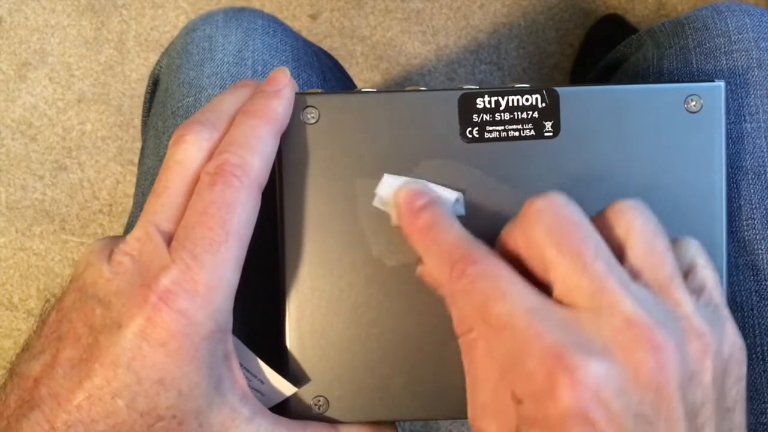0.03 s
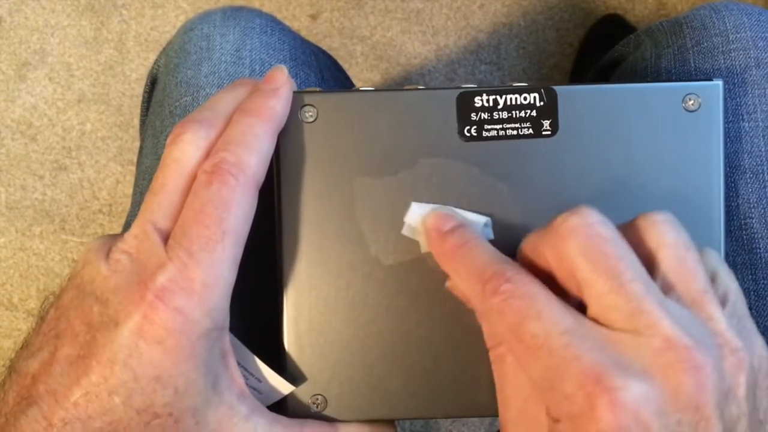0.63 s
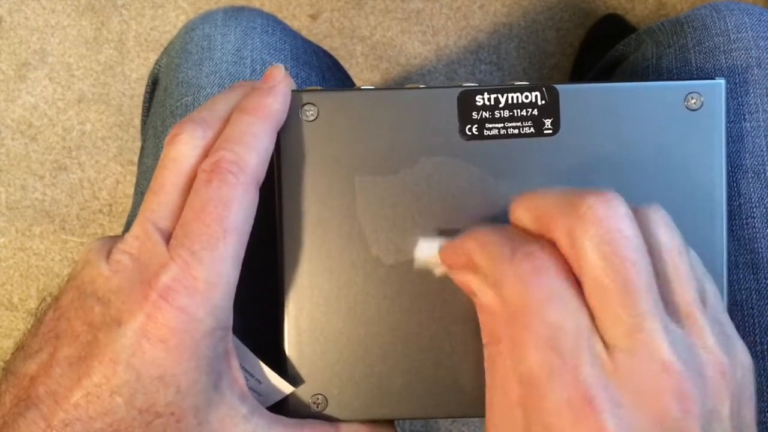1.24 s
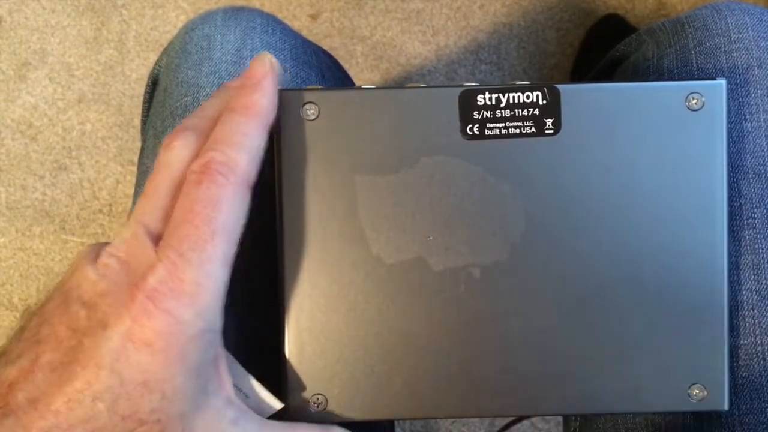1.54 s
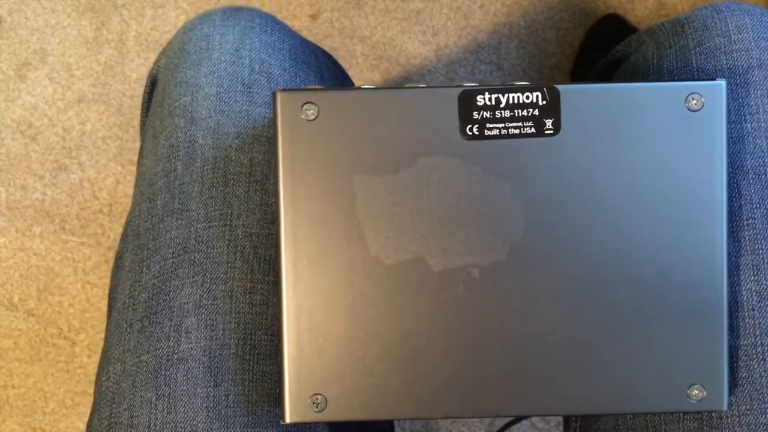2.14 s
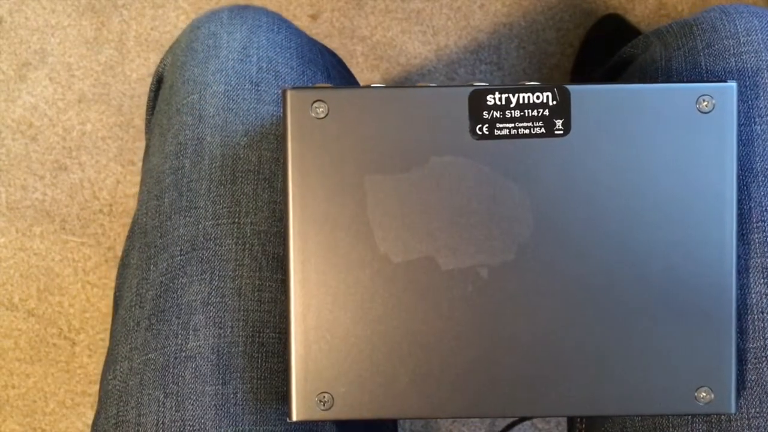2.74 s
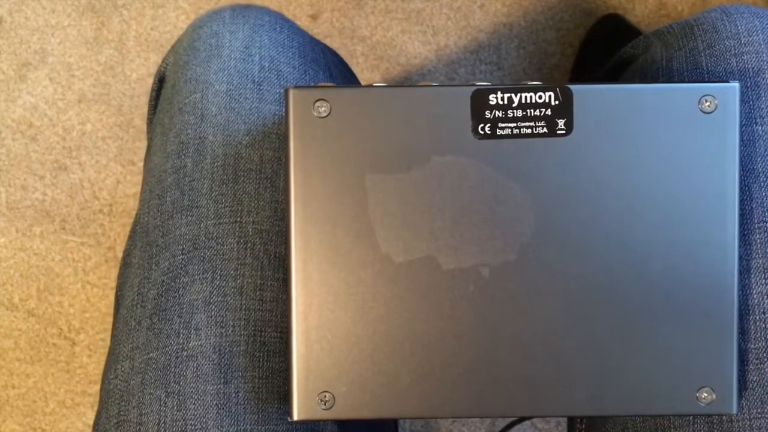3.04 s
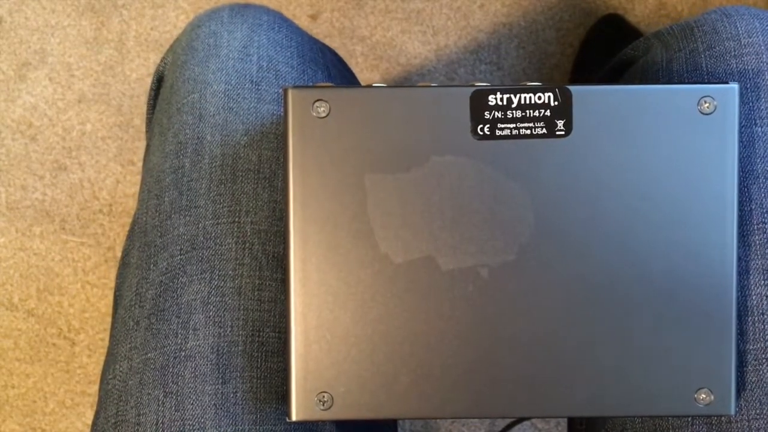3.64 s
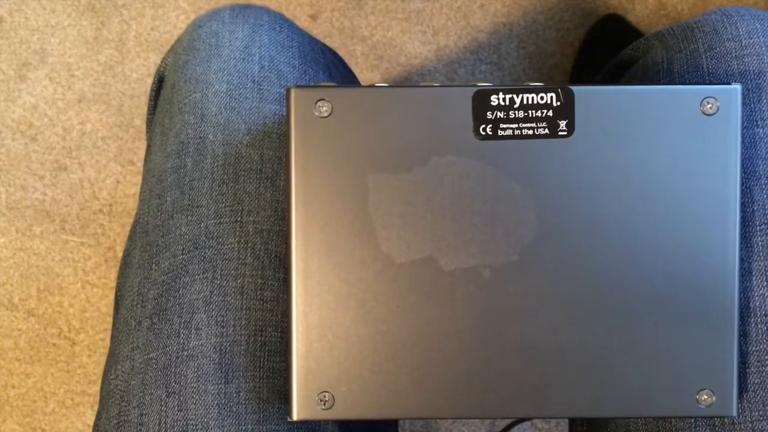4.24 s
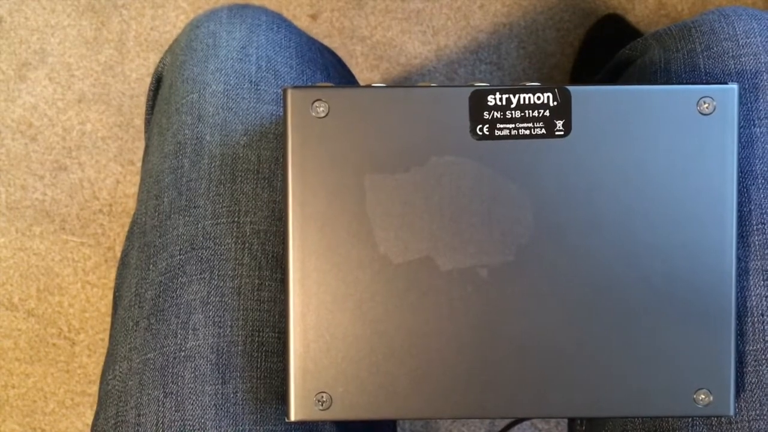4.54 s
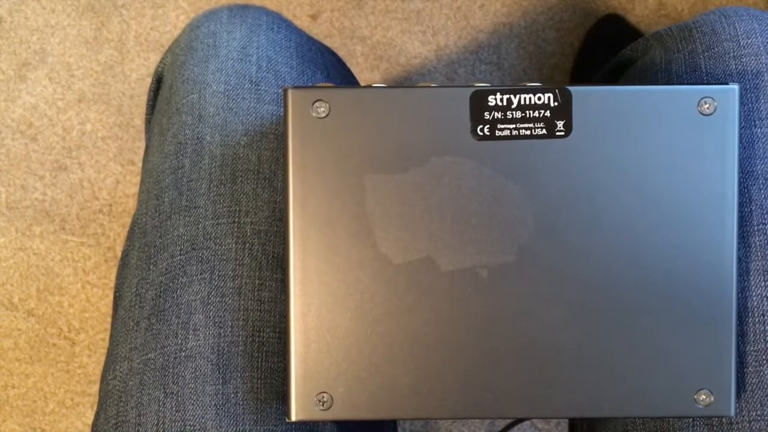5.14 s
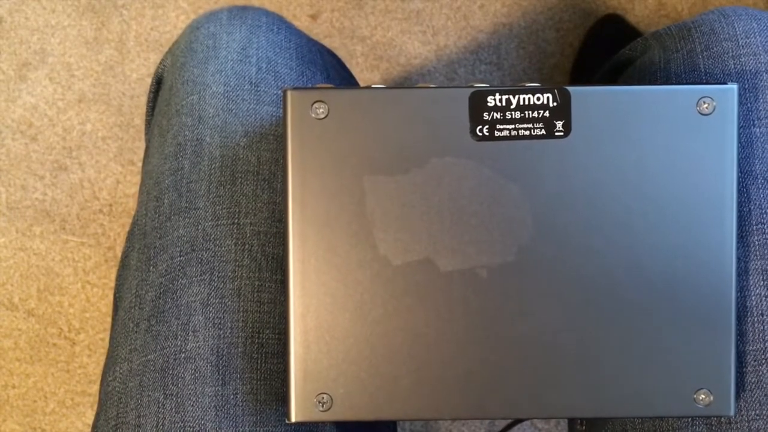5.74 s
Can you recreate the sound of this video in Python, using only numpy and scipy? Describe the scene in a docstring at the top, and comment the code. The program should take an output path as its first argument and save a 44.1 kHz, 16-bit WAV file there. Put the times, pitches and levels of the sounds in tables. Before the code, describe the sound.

A pad rubs softly on a metal plate, then light handling ticks, rustles and a dull bump follow in a quiet room.

```python
"""A small quiet room; the microphone's stand sways slowly throughout.
To 1.3 s a damp pad rubs the metal base plate of a box on someone's knees, catching and knocking it.
Near 1.6 s a hand slides off. From 2 s small things are handled to the side: rustles, crackles,
squeaks and light ticks. At 3.4 s the stand takes one dull bump; at 5.2 s a small stiff part snaps."""
import sys
import numpy as np
from scipy import signal
from scipy.fft import rfft, irfft, next_fast_len
from scipy.io import wavfile
from scipy.ndimage import map_coordinates

SR = 44100
rng = np.random.default_rng(int(sys.argv[2]) if len(sys.argv) > 2 else 0)


def log_audio(samples):
    """Write samples as a 16-bit WAV file to the path given in sys.argv[1]."""
    # one column per channel
    frames = np.atleast_2d(samples).T
    # limit to full scale, then quantise
    limited = np.clip(frames, -1, 1)
    pcm = np.round(limited * 32767).astype(np.int16)
    wavfile.write(sys.argv[1], SR, pcm)


N = 263718

# spectrum of a dry crack (frequency [Hz], level [dB])
CRACK_SPECTRUM = [(60, -25), (450, -14), (1500, -3.5), (4500, -1), (8500, -5.5), (15500, -22.5)]


def amp(db):
    """Decibels to gain."""
    return 10 ** (np.asarray(db) / 20)


def unit(x):
    """Scale to rms 1."""
    return x / np.sqrt(np.mean(x ** 2) + 1e-20)


def along(points, hz):
    """(Hz, value) points read on a log axis."""
    f, v = np.transpose(points)
    return np.interp(np.log(hz + 1), np.log(f + 1), v)


def curve(points):
    """(s, value) points read at every sample."""
    return np.interp(np.arange(N) / SR, *np.transpose(points))


def wobble(rate_hz):
    """Smooth random curve, rate_hz knots a second."""
    knots = rng.standard_normal(int(N * rate_hz / SR) + 4)
    return map_coordinates(knots, [np.arange(N) * rate_hz / SR])


def swell(peak_s, rise_s, fall_s, db):
    """Gain of one movement: exponential rise and fall."""
    t = np.arange(N) / SR - peak_s
    return amp(db) * np.exp(-np.maximum(-t / rise_s, t / fall_s))


def filtered(x, response):
    """x times a complex response of frequency."""
    size = next_fast_len(len(x) + SR // 2)
    return irfft(rfft(x, size) * response(np.fft.rfftfreq(size, 1 / SR)), size)[:len(x)]


def coloured(x, spectrum):
    """x shaped by (Hz, dB) points, at rms 1."""
    return unit(filtered(x, lambda hz: amp(along(spectrum, hz))))


def resonate(x, modes):
    """x through (Hz, width Hz, dB) resonances."""
    return filtered(x, lambda f: sum(amp(db) * 1j * f * width / (hz * hz - f * f + 1j * f * width)
                                     for hz, width, db in modes))


def click(gain, size=2048):
    """Minimum-phase pulse with this magnitude spectrum."""
    cepstrum = irfft(np.log(np.maximum(gain, 1e-6)))
    cepstrum[1:size // 2] *= 2
    cepstrum[size // 2 + 1:] = 0
    return irfft(np.exp(rfft(cepstrum)))


def add(track, s, sound):
    """Mix a sound into the track at time s."""
    part = track[round(s * SR):][:len(sound)]
    part += sound[:len(part)]


def grains(rate_hz, spread_db, share):
    """Tiny uneven fibre releases carry a share of the power; the rest is a smooth rush."""
    chance, size, sign = rng.random(N), rng.standard_normal(N), rng.standard_normal(N)
    releases = unit((chance < rate_hz / SR) * amp(spread_db * np.clip(size, -2, 2)) * np.sign(sign))
    return np.sqrt(share) * releases + np.sqrt(1 - share) * rng.standard_normal(N)


def room(x, build_s=0.0029):
    """Diffuse room tail; the treble dies first."""
    # reverberation (frequency [Hz], t60 [s])
    decay = [(150, 0.65), (800, 0.33), (5500, 0.39), (12000, 0.25)]
    hz, t, noise = signal.stft(rng.standard_normal(SR // 2), SR, nperseg=256)
    tail = signal.istft(noise * amp(-60 * t / along(decay, hz)[:, None]), SR, nperseg=256)[1]
    tail *= 1 - np.exp(-np.arange(len(tail)) / SR / build_s)
    return signal.fftconvolve(x, tail / np.linalg.norm(tail))


def air(noise_db=-69, drone_db=-76, drone_hz=121.0):
    """Quiet room noise with a faint low drone."""
    # room noise (frequency [Hz], level [dB])
    spectrum = [(110, -6.5), (190, -12), (400, -23), (1000, -29.5), (7000, -34.5), (12000, -40.5),
                (15500, -53)]
    noise = amp(noise_db) * coloured(rng.standard_normal(N), spectrum)
    return noise + amp(drone_db) * unit(resonate(rng.standard_normal(N), [(drone_hz, 19, 0)]))


def stand(sway_hz=11.6, rumble_db=-18, tremor_db=-66):
    """The springy microphone stand sways, rumbles as it moves and is bumped once."""
    # sway depth (time [s], level [dB])
    sway = [(0, -26.5), (.7, -28.5), (.9, -37.5), (2, -31.5), (3.1, -53), (3.8, -31), (4.15, -47),
            (4.6, -33.5), (5.1, -45), (5.98, -36)]
    # bump and settling contact (time [s], level [dB])
    bumps = [(3.358, 0), (3.415, -10)]
    # stand modes (frequency [Hz], level [dB], t60 [s], rise [s])
    modes = [(32.3, -6, 0.39, 0.02), (58.7, -27, 0.22, 0.0046), (136, -35.5, 0.16, 0.0028)]
    rumble_spectrum = [(10, -10), (22, 1.5), (33, 7), (48, -10.5), (75, -20.5), (400, -100)]
    phase = 2 * np.pi * np.cumsum(sway_hz * (1 + 0.0573 * wobble(4))) / SR
    rumble = coloured(rng.standard_normal(N), rumble_spectrum)
    track = amp(curve(sway)) * (unit(np.sin(phase)) + amp(rumble_db) * rumble) + amp(tremor_db) * rumble
    t = np.arange(SR) / SR
    thump = -sum(amp(db - 60 * t / t60) * (1 - np.exp(-(t / rise) ** 2)) * np.sin(2 * np.pi * hz * t)
                 for hz, db, t60, rise in modes)
    for s, db in bumps:
        add(track, s, amp(db) * thump)
    return track


def rustling(body_db=2.0, crisp_db=0.9, stir_body_db=-77, stir_crisp_db=-83):
    """Hands, sleeves and wrapping move: dull body, grainy top, soft low rush."""
    # movements (peak [s], rise [s], fall [s], body [dB], crisp [dB])
    moves = [(1.585, 0.12, 0.15, -64, -72.5), (2.6, 0.07, 0.08, -67.5, -75.5),
             (2.85, 0.058, 0.079, -65, -66), (3.32, 0.097, 0.077, -63, -67.5),
             (3.809, 0.043, 0.069, -56.5, -67), (4.029, 0.023, 0.069, -55.5, -71),
             (4.247, 0.012, 0.09, -59.5, -67), (4.81, 0.029, 0.13, -70.5, -78.5),
             (4.99, 0.072, 0.078, -71.5, -69.5), (5.8, 0.25, 0.12, -66.5, -74)]
    # dull part (frequency [Hz], level [dB])
    body_spectrum = [(220, 2.5), (1200, -1.5), (2000, -3.5), (3000, -9.5), (10000, -40.5)]
    # crisp part (frequency [Hz], level [dB])
    crisp_spectrum = [(1500, -41), (3200, 0), (6000, -1), (10000, -7), (15500, -16)]
    # low rush of cloth (time [s], level [dB])
    cloth_rush = [(1.3, -80), (1.7, -69.5), (2.5, -68), (2.95, -86.5), (5.1, -83), (5.4, -69.5)]
    cloth_spectrum = [(120, -21), (310, -1), (480, -12), (3000, -43)]
    stir = swell(1.9, 0.19, 2.7, 0)  # the arms settle after letting go
    body_power = sum(swell(s, rise, fall, db) ** 2 for s, rise, fall, db, _ in moves)
    crisp_power = sum(swell(s, rise, fall, db) ** 2 for s, rise, fall, _, db in moves)
    body_gain = np.sqrt(body_power + (amp(stir_body_db) * stir) ** 2)
    crisp_gain = np.sqrt(crisp_power + (amp(stir_crisp_db) * stir) ** 2)
    grip_db = 1.7 * wobble(45)
    body = body_gain * amp(body_db + grip_db) * coloured(grains(400, 8.0, 0.27), body_spectrum)
    crisp = crisp_gain * amp(crisp_db + grip_db) * coloured(grains(160, 5.8, 0.37), crisp_spectrum)
    cloth = amp(curve(cloth_rush)) * coloured(rng.standard_normal(N), cloth_spectrum)
    return body + crisp + cloth


def sliding():
    """Skin and fabric slide with a pitched hiss."""
    # slides (peak [s], rise [s], fall [s], level [dB], centre [Hz], width [Hz])
    slides = [(0.64, 0.063, 0.033, -68, 5800, 4500), (1.565, 0.069, 0.12, -68, 7400, 8000),
              (1.93, 0.13, 0.19, -73.5, 5630, 2030), (2.45, 0.35, 0.34, -76.5, 5400, 1990),
              (4.025, 0.0044, 0.036, -56.5, 3700, 1500), (5.592, 0.0026, 0.044, -62, 6340, 5500)]
    track = np.zeros(N)
    for s, rise, fall, db, hz, width in slides:
        hiss = resonate(grains(900, 4.5, 0.091), [(hz, width, 0)])
        track += swell(s, rise, fall, db) * unit(resonate(hiss, [(hz, 2 * width, 0)]))
    return track


def crackles(decay_s=0.0016, room_db=-8):
    """Wrapping and tacky fingers give brief dry bursts."""
    # crackles (time [s], level [dB])
    bursts = [(1.072, -60.5), (1.35, -61), (2.7555, -60), (2.808, -56), (3.331, -56), (3.398, -62),
              (3.47, -61), (3.7388, -54.5), (3.89, -60), (4.893, -57.5), (5.027, -58), (5.166, -57.5)]
    track, t = np.zeros(N), np.arange(SR // 50) / SR
    for s, db in bursts:
        noise = coloured(rng.standard_normal(len(t)), CRACK_SPECTRUM)
        add(track, s, amp(db) * np.exp(-t / decay_s) * noise)
    return track + amp(room_db) * room(track)[:N]


def squeaks(sag_ratio=0.14, width_ratio=0.12):
    """Damp pad and fingertips stick and slip: a narrow rasp that swells and sinks in pitch."""
    # squeaks (start [s], length [s], pitch [Hz], level [dB])
    rasps = [(0.108, 0.14, 4700, -71.5), (0.262, 0.038, 3670, -70.5), (.445, 0.015, 5500, -70),
             (.861, 0.01, 10200, -67.5), (2.882, 0.034, 5800, -63), (4.75, .12, 2650, -76),
             (4.885, 0.03, 5000, -68)]
    track = np.zeros(N)
    for s, length_s, hz, db in rasps:
        progress = np.linspace(-0.5, 0.5, round(length_s * SR))
        phase = 2 * np.pi * np.cumsum(hz * (1 - sag_ratio * progress)) / SR
        lowpass = signal.butter(2, width_ratio * hz, fs=SR, output="sos")
        ragged = signal.sosfilt(lowpass, rng.standard_normal((2, len(progress))))
        rasp = unit(ragged[0] * np.cos(phase) + ragged[1] * np.sin(phase))
        add(track, s, amp(db) * np.cos(np.pi * progress) * rasp)
    return track


def tick_colour(hz, pitch_hz, breadth_oct, crack_db, below_db_per_oct=7.5, above_db_per_oct=17):
    """Contact spectrum: a hump, narrow for a tap and broad for a clack, plus a bright crack."""
    octaves = np.log2((hz + 1) / pitch_hz)
    away_oct = np.hypot(octaves, breadth_oct) - abs(breadth_oct)
    body = amp(-away_oct * np.where(octaves < 0, below_db_per_oct, above_db_per_oct))
    return np.hypot(body, amp(crack_db + along(CRACK_SPECTRUM, hz)))


def ticks(direct_db=3.5, room_db=-11, ring_db=-56, ripple_db=2.5, chatter=0.076, chatter_s=0.0027):
    """Handled things touch, each with uneven resonances; nearby objects and the room ring on."""
    # contacts (time [s], level [dB], pitch [Hz], breadth [oct], crack re body [dB])
    contacts = [(2, -25, 804, 0.28, -17.5), (2.5995, -17.5, 1850, 0.06, -29), (2.7975, -17, 1600, 0.18, -5),
                (2.8393, -17.5, 524, 0.23, -8.5), (2.9115, -17, 1170, .15, -14),
                (3.057, -20, 1170, 0.23, -12.5), (3.1748, -19, 1150, 0.24, -25),
                (3.186, -22.5, 420, 0.28, -26), (3.289, -28, 3200, .1, -0.5), (3.6924, -16, 420, 1, -37),
                (3.754, -4.5, 660, 0.092, -29.5), (3.7742, -14.5, 1800, 0.18, -17),
                (3.785, -6.5, 1140, .22, -22), (4.0086, -25, 3800, 0.22, -17),
                (4.022, -10.5, 377, .5, -23.5), (4.156, -15.5, 1190, 0.27, -26),
                (4.3197, -11.5, 780, 1.3, -23), (4.3293, -13, 790, 0.58, -23),
                (5.3135, -27.5, 3300, 0.62, -20), (5.5878, -35, 3400, .6, -5),
                (5.8139, -16, 1050, 1.5, -16)]
    # modes of hard objects nearby (frequency [Hz], level [dB], t60 [s])
    ring_modes = [(427.3, 0, 0.18), (605, -5, 0.19), (678.3, 3, 0.21), (776, -3, 0.3), (937, -6, 0.38),
                  (1156, -2.5, 0.37), (1384, -2, 0.37), (1772, 2, 0.25)]
    size = 2048
    track, hz, t = np.zeros(N), np.fft.rfftfreq(size, 1 / SR), np.arange(SR // 2) / SR
    for s, db, pitch_hz, breadth_oct, crack_db in contacts:
        colour = amp(db) * tick_colour(hz, pitch_hz, breadth_oct, crack_db)
        ripple = map_coordinates(rng.standard_normal(40), [np.sqrt(hz) / 4], mode="nearest")
        contact_s = chatter_s * amp(-0.32 * crack_db)  # dull contacts last longer
        force = chatter * rng.standard_normal(size) * np.exp(-t[:size] / contact_s)
        force[0] = 1
        force /= np.linalg.norm(force)
        direct = click(colour * amp(ripple_db * ripple))
        spread = click(colour * amp(0.5 * ripple_db * ripple))  # smoother over all directions
        ring = sum(amp(mode_db + rng.normal(0, 1.9) - 60 * t / t60) * np.sin(2 * np.pi * mode_hz * t)
                   for mode_hz, mode_db, t60 in ring_modes)
        far_db = -0.35 * crack_db  # crisp contacts are near: less room and ring
        add(track, s, amp(direct_db) * signal.fftconvolve(force, direct))
        add(track, s, amp(room_db + far_db) * room(spread))
        add(track, s, amp(ring_db + far_db) * signal.fftconvolve(spread, ring))
    return track


def snap(level_db=-7.0, room_db=-18):
    """A small stiff part clicks home; its strongest contact excites the room."""
    # quick run of contacts (time [s], level [dB])
    contacts = [(5.1977, -16), (5.2001, -2.5), (5.202, -14)]
    # damped modes of the part (frequency [Hz], width [Hz], level [dB])
    modes = [(1840, 620, 0.5), (3230, 190, 3.5), (4990, 310, 4), (6120, 370, 4), (7300, 400, -10)]
    # its lingering mode (frequency [Hz], width [Hz], level [dB])
    ring_modes = [(5120, 18, 7.5)]
    spread_spectrum = [(900, -15), (1900, -1), (4400, -7), (5200, -1), (7200, -2), (8500, -15),
                       (15500, -27)]
    blows = np.zeros(N)
    for s, db in contacts:
        blows[round(s * SR)] += amp(db + level_db)
    band = signal.butter(1, [1400, 7500], "bandpass", fs=SR, output="sos")
    track = signal.sosfilt(band, resonate(blows, modes + ring_modes))
    spread = click(amp(along(spread_spectrum, np.fft.rfftfreq(2048, 1 / SR))))
    add(track, contacts[1][0], amp(room_db) * room(spread))
    return track


def plate(force):
    """The metal plate, driven through a soft pad that blocks fast force changes."""
    # modes damped by hand and knees (frequency [Hz], width [Hz], level [dB])
    modes = [(310, 84, -2), (409, 64, 0.5), (487.4, 11, 3), (533.4, 8.4, 6), (652, 18, -4)]
    cushion = signal.butter(2, [280, 750], "bandpass", fs=SR, output="sos")
    return signal.sosfilt(cushion, resonate(force, modes))


def knocks(gain_db=37, shudder=0.054, shudder_s=0.011, room_db=-8):
    """The pad catches and lets go; each slip knocks the plate."""
    # slips (time [s], level [dB])
    slips = [(0.247, -48), (.487, -42), (0.58, -45.5), (0.807, -45.5), (1.213, -58)]
    blows, t = np.zeros(N), np.arange(SR // 20) / SR
    for s, db in slips:
        slip = shudder * rng.standard_normal(len(t)) * np.exp(-t / shudder_s)
        slip[0] = 1
        add(blows, s, amp(db + gain_db) * slip)
    direct = plate(blows)
    return direct + amp(room_db) * room(direct)[:N]


def rubbing(firm_db=-62, drone_db=-62, fizz_db=-69, sweep_db=-76.5, sweep_hz=8.9, slow_pitch_ratio=0.71):
    """Pad fibres scrape, hiss and drive the plate; the scrape drops in pitch as the stroke slows."""
    # rubbing effort (time [s], level [dB])
    effort = [(0.02, -60.5), (.165, -61), (.3, -64), (.45, -65.5), (.6, -58.5), (.97, -68), (1.08, -82)]
    # scrape of a quick stroke (frequency [Hz], level [dB])
    scrape_spectrum = [(950, -13), (1350, -8), (2000, -1.5), (2450, -7), (2850, -4.5), (3400, -15.5),
                       (11000, -43.5)]
    # grainy hiss (frequency [Hz], level [dB])
    fizz_spectrum = [(2500, -15), (3800, -4), (4900, -2), (6200, -5.5), (10000, -25)]
    sweep_spectrum = [(6000, -7), (9500, 3.5), (13000, -0.5), (15500, -19.5)]
    effort_db = curve(effort)
    press_db = effort_db - firm_db
    touching = curve([(1.3, 0.94), (1.45, 0.033)])
    slowing = curve([(0.47, 0.051), (0.92, 0.77)])
    drone = amp(drone_db + 0.88 * press_db) * unit(plate(grains(550, 3.0, 0.63)))
    slow_spectrum = [(slow_pitch_ratio * hz, db) for hz, db in scrape_spectrum]
    quick = coloured(grains(1500, 3.8, 0.41), scrape_spectrum)
    slow = coloured(grains(1500, 3.8, 0.41), slow_spectrum)
    scrape = np.cos(np.pi / 2 * slowing) * quick + np.sin(np.pi / 2 * slowing) * slow
    scrape *= amp(effort_db + 0.61 * wobble(35.5))
    t = np.arange(N) / SR
    speed = np.abs(np.cos(np.pi * sweep_hz * (t - 0.06)))  # to and fro: the hiss sinks at each turn
    fizz = coloured(grains(1400, 5.8, 0.73), fizz_spectrum)
    fizz *= amp(fizz_db + 1.5 * press_db + 4.7 * (speed - 2.5))
    sweeps = coloured(rng.standard_normal(N), sweep_spectrum)
    sweeps *= amp(sweep_db - 17 * slowing) * speed ** 1.4
    return touching * (drone + scrape + fizz + sweeps)


def scene():
    """All sources at one close microphone."""
    pad = rubbing() + knocks()
    handling = rustling() + sliding() + squeaks() + crackles() + ticks() + snap()
    return (pad + handling + stand() + air())[None]


def record(dry, top_hz=15700):
    """Brick-wall low-pass at top_hz."""
    return np.array([filtered(channel, lambda hz: hz < top_hz) for channel in dry])


dry = scene()
out = record(dry)
log_audio(out)
```